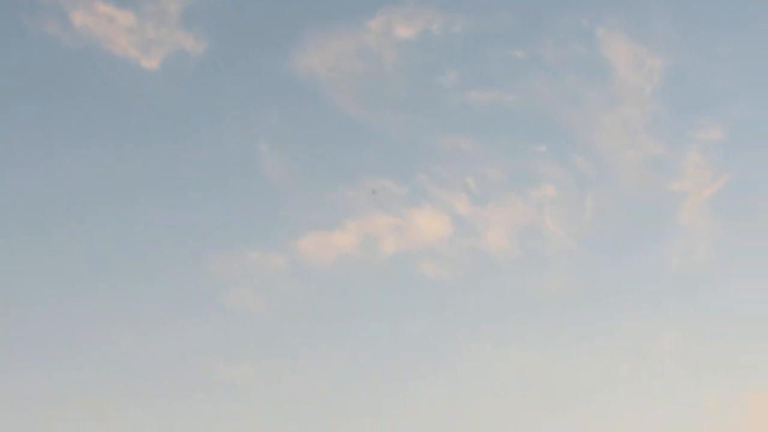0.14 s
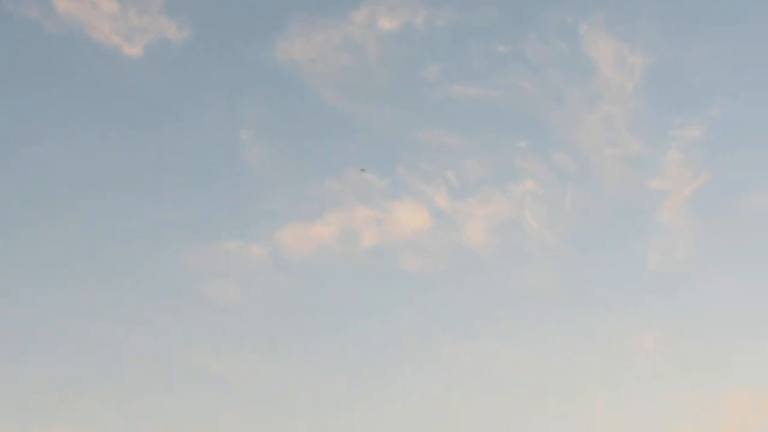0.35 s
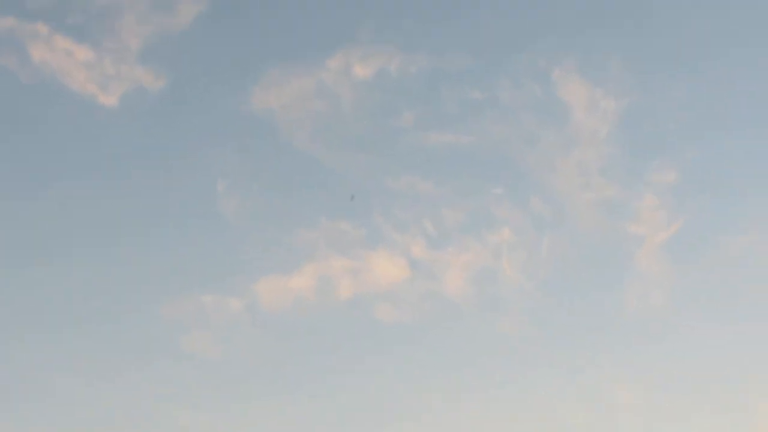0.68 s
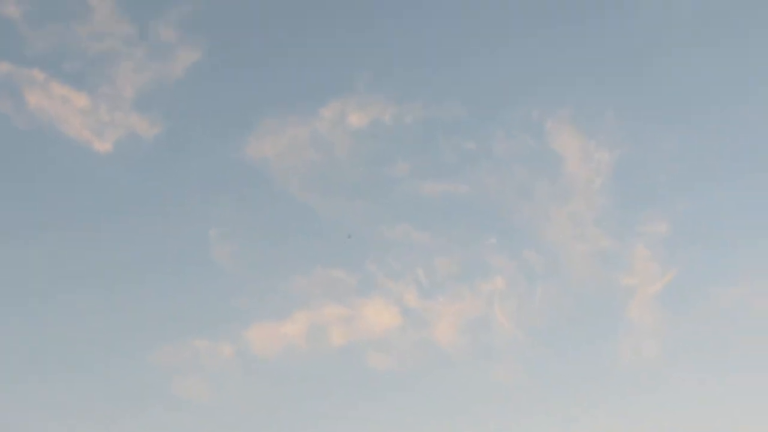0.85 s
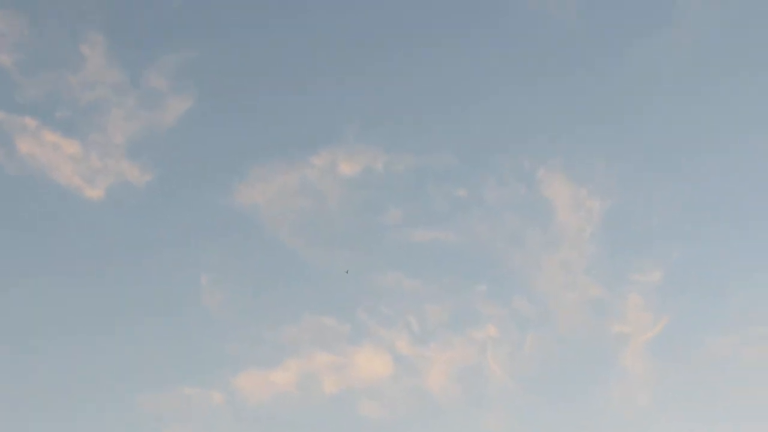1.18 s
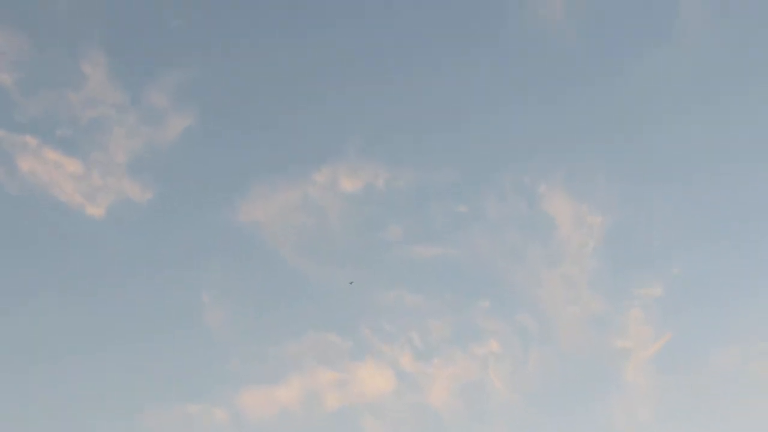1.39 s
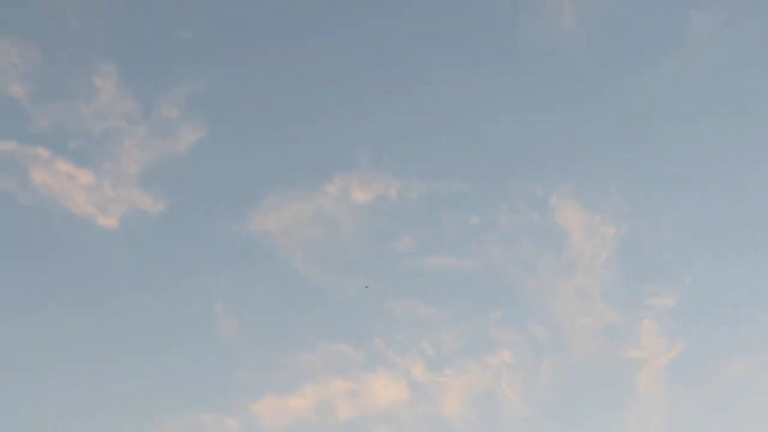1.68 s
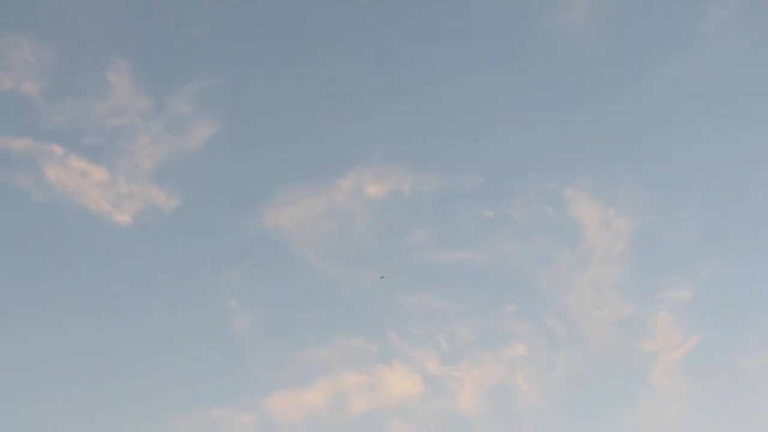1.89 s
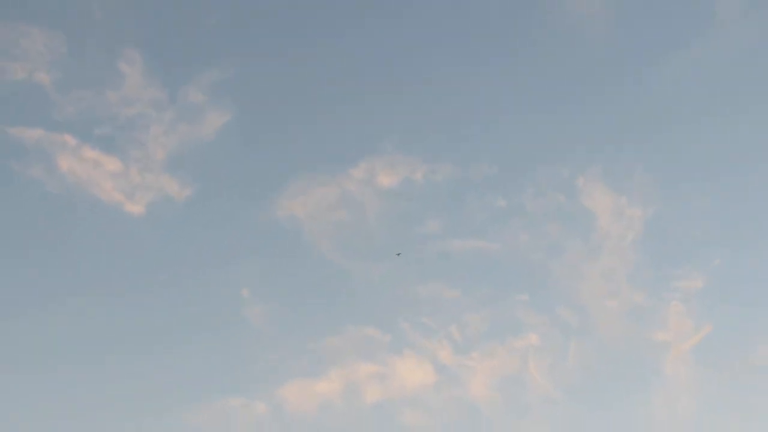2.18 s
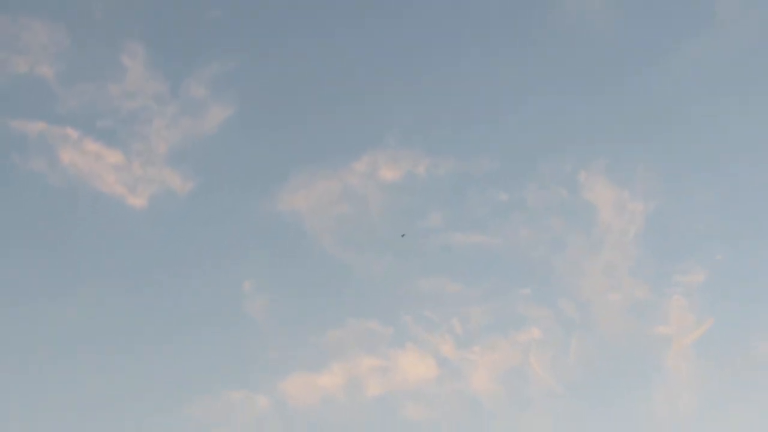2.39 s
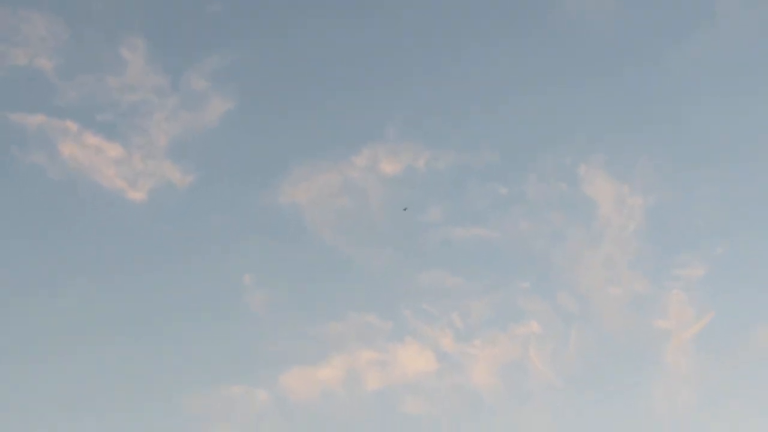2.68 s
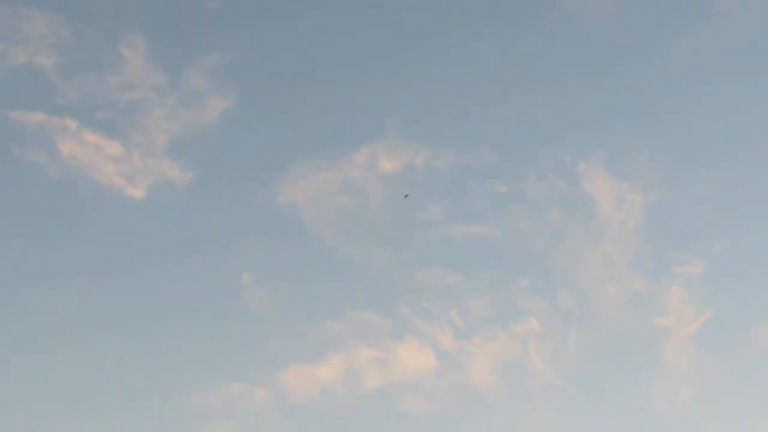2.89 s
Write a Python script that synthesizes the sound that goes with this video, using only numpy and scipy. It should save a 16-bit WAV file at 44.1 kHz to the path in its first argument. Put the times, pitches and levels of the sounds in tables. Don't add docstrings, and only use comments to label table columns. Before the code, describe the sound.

A nighthawk circling high overhead gives two short nasal buzzes, one early and one late. Between them, wind rumbles and slaps hard at a small camera microphone; a faint car hisses past over low distant town noise.

```python
import sys
import numpy as np
from scipy import signal
from scipy.fft import rfft, irfft, next_fast_len
from scipy.io import wavfile
from scipy.ndimage import uniform_filter1d

SR = 44100
rng = np.random.default_rng(int(sys.argv[2]) if len(sys.argv) > 2 else 0)


def boost(x):
    u = np.asarray(x, float) / 20
    return 10 ** u


def pcm_store(signal):
    levels = np.round(np.clip(np.atleast_2d(signal), -1, 1) * 32767)
    wavfile.write(sys.argv[1], SR, levels.astype(np.int16).T)


N = 134505
CROSS = 0.5


def evened(x):
    return x / np.sqrt(np.mean(x ** 2) + 1e-20)


def along(table, t):
    rows = np.transpose(table)
    return [np.interp(t, rows[0], column) for column in rows[1:]]


def read(points, hz):
    f, value = np.transpose(points)
    return np.interp(np.log(hz + 1), np.log(f + 1), value)


def tinted(points, count=1):
    size = next_fast_len(N)
    spectrum = rfft(rng.standard_normal((count, size)))
    spectrum *= boost(read(points, np.fft.rfftfreq(size, 1 / SR)))
    return evened(irfft(spectrum, size)[:, :N])


def lumps(hz):
    slow = tinted([(1, 0), (hz, -6), (3 * hz, -50), (9 * hz, -140)])[0]
    return 2 * np.tanh(0.5 * slow)


def add(mix, s, sound):
    part = mix[..., round(s * SR):][..., :sound.shape[-1]]
    part += sound[..., :part.shape[-1]]


# freq_hz, level_db
TOWN_SPECTRUM = [(18, -13), (30, 1), (115, -2), (355, -17.5), (780, -11), (1320, -24), (1810, -24.5),
                 (3870, -27.5), (16000, -39)]
# freq_hz, likeness (-1 to 1)
PORT_LIKENESS = [(60, -0.3), (240, 0.41), (950, -0.75), (3770, 0.023), (15000, -0.17)]


def town():
    town_db = -52
    a, b = rfft(tinted(TOWN_SPECTRUM, count=2))
    same = np.clip(read(PORT_LIKENESS, np.fft.rfftfreq(N, 1 / SR)), -1, 1)
    right = same * a + np.sqrt(1 - same ** 2) * b
    return boost(town_db) * irfft(np.array([a, right]), N)


# freq_hz, level_db
TYRE_SPECTRUM = [(500, -4.5), (900, -3), (1350, 1.5), (1700, -5), (2300, -15), (5000, -26)]
# time_s, level_db
PASSAGE = [
    (0, -60.5),
    (.15, -52.5),
    (.35, -49.5),
    (.72, -52.5),
    (.85, -68),
    (2.6, -61.5),
    (3.05, -57.5),
]


def car():
    c, d = tinted(TYRE_SPECTRUM, count=2)
    level_db = along(PASSAGE, np.arange(N) / SR)[0] + 0.73 * lumps(7.1)
    return boost(level_db) * np.array([c, 0.44 * c + 0.8 * d])


# time_s, left_gust_db, right_db
GUST_LEVELS = [(0.0, -50.5, -47), (0.21, -57.5, -39), (0.49, -34.5, -25.5), (0.59, -41, -36),
               (0.85, -25, -46), (1.13, -30.5, -31), (1.15, -15, -43), (1.21, -24, -32), (1.49, -29.5, -53),
               (1.55, -54, -40), (1.57, -37, -36), (2.02, -26.5, -48), (2.1, -53, -45), (2.12, -41, -34),
               (2.39, -33.5, -41), (2.45, -46.5, -26.5), (2.79, -23, -45), (3.05, -43.5, -61)]
# freq_hz, level_db
SOFT_WIND = [(8.8, -34.5), (15, -12), (91, 1), (286, -26), (449, -66), (497, -40), (562, -72.5), (764, -57),
             (2000, -76.5), (2600, -97), (4400, -120)]
# freq_hz, level_db
HARD_WIND = [(8.8, -46), (15, 5), (59, -2.5), (184, 2.5), (436, -16), (487, -22.5), (793, -39),
             (1130, -62.5), (3000, -89), (3900, -109), (6600, -120)]


def turbulence():
    gust_cap_db, lump_db, lump_hz = -27, 4, 29.6
    wind_db, wind_cut_hz = 12.5, 36
    bright, fizz_db = 0.93, -8
    left_db, right_db = along(GUST_LEVELS, np.arange(N) / SR)
    left_db = uniform_filter1d(np.minimum(left_db, gust_cap_db), size=400)
    left = boost(left_db + lump_db * lumps(lump_hz / 2)) * tinted(SOFT_WIND)[0]
    hard_db = left_db + fizz_db + bright * (left_db + 33.5)
    left += boost(hard_db + lump_db * lumps(lump_hz)) * tinted(HARD_WIND)[0]
    left = boost(wind_db) * signal.lfilter(*signal.butter(2, wind_cut_hz, "hp", fs=SR), left)
    right = boost(right_db + lump_db * lumps(lump_hz / 2)) * tinted(SOFT_WIND)[0]
    return left, right


# time_s, peak_db, pitch_hz
EDDIES = [(0.83, -2, 140), (0.862, -19, 274.2), (0.888, 0.9, 204), (0.917, -5.5, 110), (0.949, -6.5, 178),
          (0.971, -7, 144), (1.046, -2.2, 192), (1.148, -0.0, 112), (1.189, 4, 350), (1.239, 1.2, 248),
          (1.275, -10.5, 346), (1.357, -9.5, 470), (1.386, 0, 181), (1.424, -12.5, 327),
          (1.438, -12.5, 260), (1.759, -9.5, 157), (1.862, -12, 149), (1.918, -8, 163), (1.942, -9.5, 166),
          (1.992, -5.5, 154), (2.024, -10, 176), (2.609, -12, 102), (2.666, -7, 196), (2.745, 1, 170),
          (2.771, -4.5, 250), (2.801, -3.9, 129), (2.818, -1, 151.3), (2.848, -13.5, 206),
          (2.878, -17, 350)]
# time_s, peak_db, pitch_hz
HARD_SLAPS = [(.831, -3.5, 193), (1.148, -2, 169), (1.19, -14, 700), (2.785, 2.5, 107), (0.39, -13, 143),
              (0.52, -28.5, 600), (2.285, -32, 650), (1.346, -13, 504), (1.401, -4.5, 325),
              (1.42, -20.5, 710), (2.905, -7.5, 185), (.89, -16, 535), (1.45, -9, 337), (1.239, -8.5, 430),
              (1.178, -5.5, 246), (1.387, -10.5, 470), (2.607, -15.5, 227), (1.98, -17.5, 274)]
# time_s, level_db
PORT_SNAPS = [
    (0.8288, -19.5),
    (1.1455, -23.5),
    (1.1515, -24),
    (1.19, -24.5),
    (2.7865, -22.5),
]


def eddies():
    eddy_cap_db, eddy_db, eddy_cycles, snap_s = -4, 3, 0.53, 0.00005
    left = np.zeros(N)
    capped = [(s, min(db, eddy_cap_db), hz) for s, db, hz in EDDIES]
    for s, db, hz in capped + list(HARD_SLAPS):
        cycles = np.arange(-2, 2, hz / SR) + 0.083
        envelope = boost(db + eddy_db) / np.cosh(cycles / eddy_cycles) ** 2
        add(left, s - 2.0 / hz, envelope * np.cos(2 * np.pi * (cycles - 0.1)))
    for s, db in PORT_SNAPS:
        add(left, s, boost(db) * np.exp(-np.arange(60) / SR / snap_s))
    return left


def wind():
    left, right = turbulence()
    left = left + eddies()
    return np.array([left - CROSS * right, right - CROSS * left])


# share_of_length (0-1), top_pitch_hz, dip_per_buzz_hz, level_db, chop (0-1), overtone_db
CALL_COURSE = [
    (0, 2000, 398, -13, .95, -22),
    (.032, 2800, 686, -11, .95, -17.5),
    (.042, 4350, 1960, -7, 0.5, -16.5),
    (.1, 4573, 1591, 2, 0.89, -25.5),
    (.62, 4606, 1500, -2, 0.96, -22),
    (.75, 3918, 801, -1, 0.83, -20.5),
    (.86, 3910, 810, -3, 0.56, -25),
    (.95, 4150, 118, -0.5, 0.21, -21),
    (1, 4070, 40.4, -14.5, 0, -23),
]


def call(length, db, wobble):
    buzz_per_s, rate_jitter, rasp = 229.5, 0.03, 0.09
    pulse_sharp, pulse_spread_db = 1.7, 2.6
    lead, dip_sharp = 0.16, 4.0
    throat_hz, throat_db_per_khz = 4600, 2
    overtone_chop, overtone_late, dip_overtone = 0.9, 0.06, 0.47
    pan_db, overtone_pan_db = -5.5, 4
    t = np.arange(0, length, 1 / SR)
    top, dip, level, chop, over = along(CALL_COURSE, t / length)

    luck = rng.standard_normal((100, 4))
    late = np.interp(buzz_per_s * t, np.arange(100), luck[:, 0])
    turns = buzz_per_s * t + rate_jitter * wobble / 40 * late
    size, bend, shine = (np.interp(turns, np.arange(100) + 0.5, luck[:, k]) for k in (1, 2, 3))
    swell = np.sin(np.pi * turns) ** 2
    low = abs(np.cos(np.pi * (turns + lead))) ** dip_sharp

    hz = top - dip * low + wobble * chop * bend
    hiss = uniform_filter1d(uniform_filter1d(rng.standard_normal(SR), size=16), size=16)
    roughness = rasp * np.sqrt(wobble / 30) * chop * evened(hiss)[:len(t)]
    phase = 2 * np.pi * np.cumsum(hz) / SR + roughness

    throat = boost(-throat_db_per_khz * np.hypot(hz - throat_hz, 200) / 1000)
    first = (1 - chop + chop * swell ** pulse_sharp) * throat * np.sin(phase)
    choke = overtone_chop * chop ** 3 * np.cos(np.pi * (turns - overtone_late)) ** 2
    second = 1 - choke + dip_overtone * low * (1 - chop) * dip / 160
    upper = second * np.sin(2 * phase) + chop * (low + 0.033) * np.sin(3 * phase)

    side = np.array([[0.5], [-0.5]])
    voice = boost(side * pan_db) * first
    voice = voice + boost(over + side * overtone_pan_db + 1.4 * chop * shine) * upper
    pulse_db = pulse_spread_db * np.sqrt(wobble / 40) * chop * size
    return voice * boost(db + 7 + level + pulse_db)


def tail(t60):
    t = np.arange(SR // 2) / SR
    taps = rng.standard_normal((2, SR // 2)) * boost(-60 * t / t60)
    return taps / np.linalg.norm(taps[0])


# start_s, length_s, level_db, pitch_wobble_hz
CALLS = [
    (.3005, .303, -31.5, 34.8),
    (2.4648, .305, -30, 69.7),
]


def bird():
    air_hz, scatter_db, scatter_t60 = 11500, -11, 0.035
    echo_db, echo_t60, echo_hz = -6.5, 0.45, 3300
    direct = np.zeros((2, N))
    for start, length, db, wobble in CALLS:
        add(direct, start, call(length, db, wobble))
    direct = signal.sosfilt(signal.butter(2, [1700, air_hz], "bp", fs=SR, output="sos"), direct)
    dull = signal.sosfilt(signal.butter(6, echo_hz, fs=SR, output="sos"), tail(echo_t60))
    space = boost(scatter_db) * tail(scatter_t60) + boost(echo_db) * dull
    return direct + signal.fftconvolve(direct, space, axes=1)[:, :N]


def scene():
    return town() + car() + wind() + bird()


def low_pass(x):
    return signal.sosfilt(signal.butter(12, 16470, fs=SR, output="sos"), x)


def record(dry):
    knee_db, squeeze, recover_db_per_s, ceiling = -9.5, 0.5, 5.5, 0.995
    power_db = 10 * np.log10(abs(uniform_filter1d(dry[0] ** 2, size=900)) + 1e-12)
    rise = np.arange(N) * recover_db_per_s / SR
    held_db = np.maximum.accumulate(power_db + rise) - rise
    over_db = np.maximum(held_db - knee_db, 0)
    left, right = dry / boost(squeeze * uniform_filter1d(over_db, size=300))
    spill = left - np.clip(left, -ceiling, ceiling)
    return low_pass(np.array([left - spill, right + CROSS * spill]))


dry = scene()
out = record(dry)
pcm_store(out)
```